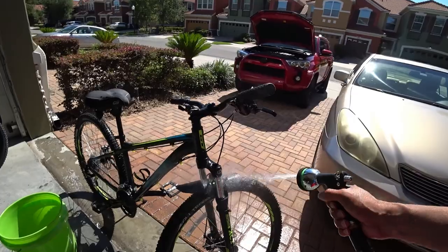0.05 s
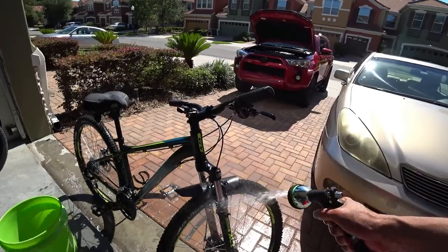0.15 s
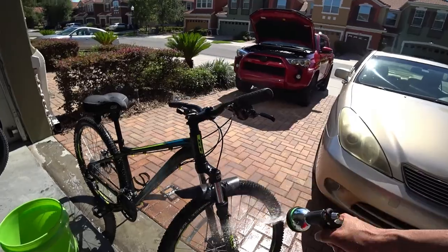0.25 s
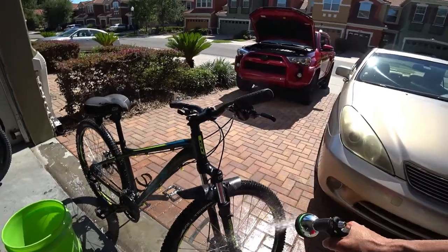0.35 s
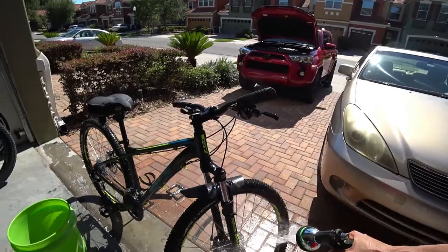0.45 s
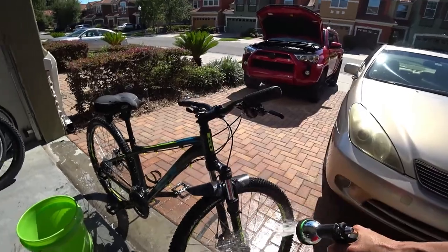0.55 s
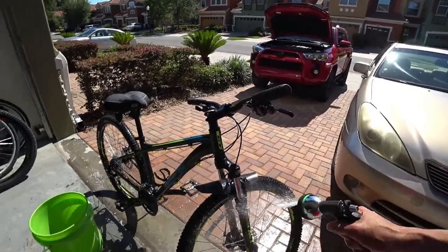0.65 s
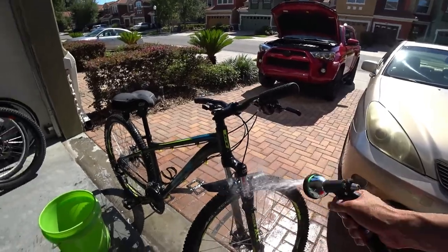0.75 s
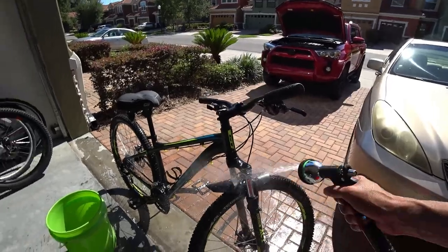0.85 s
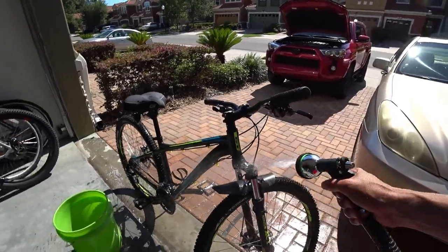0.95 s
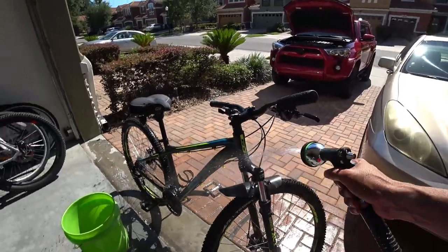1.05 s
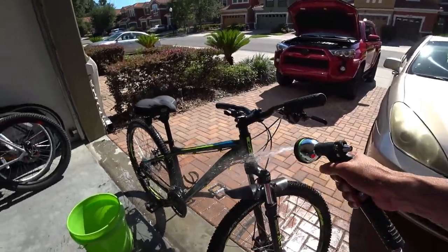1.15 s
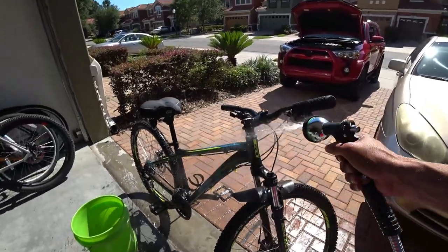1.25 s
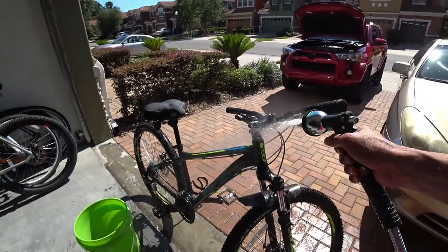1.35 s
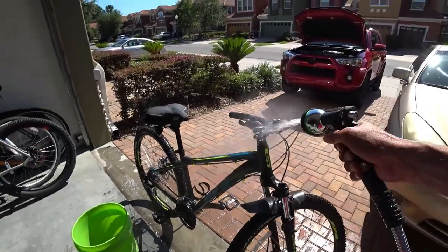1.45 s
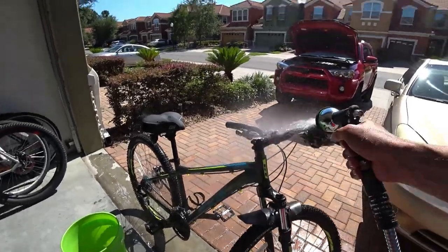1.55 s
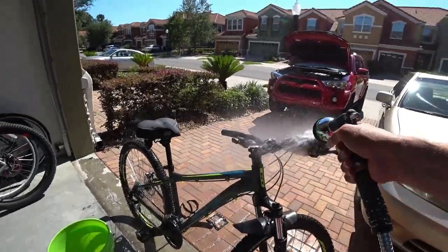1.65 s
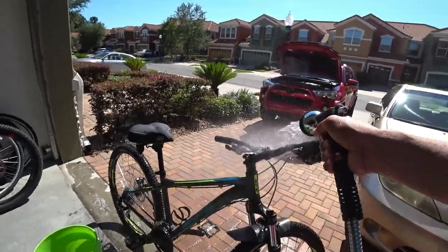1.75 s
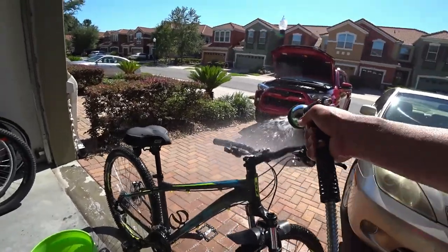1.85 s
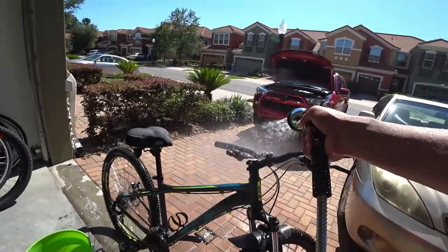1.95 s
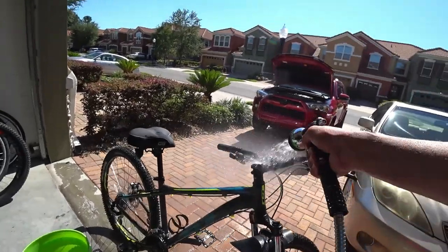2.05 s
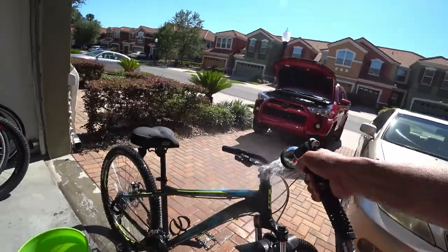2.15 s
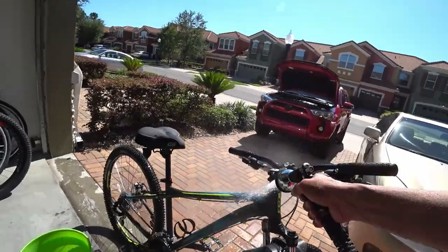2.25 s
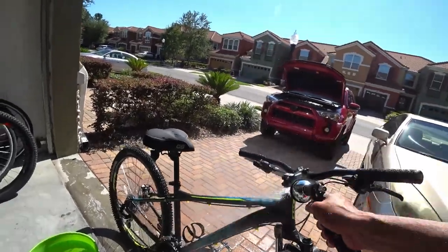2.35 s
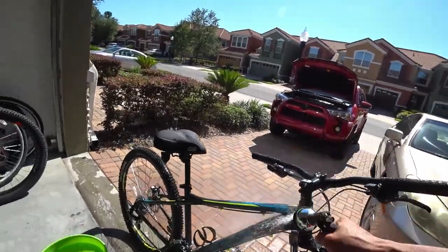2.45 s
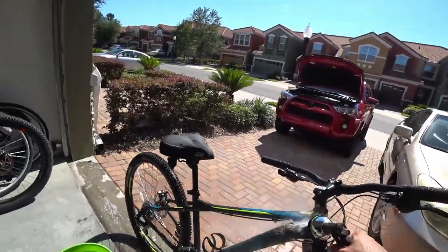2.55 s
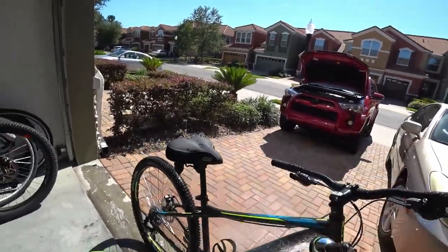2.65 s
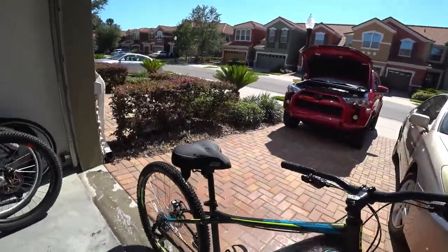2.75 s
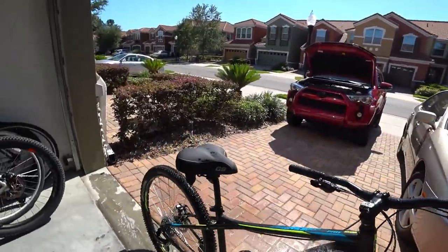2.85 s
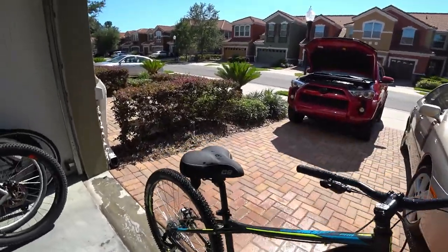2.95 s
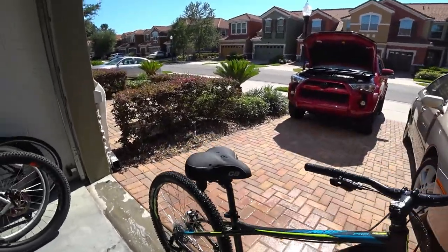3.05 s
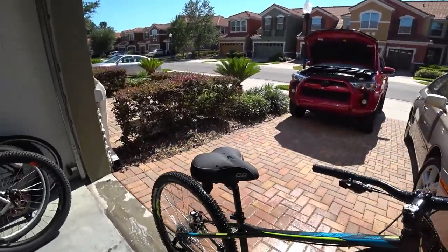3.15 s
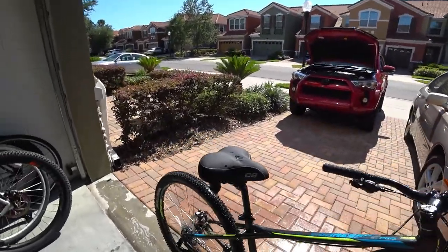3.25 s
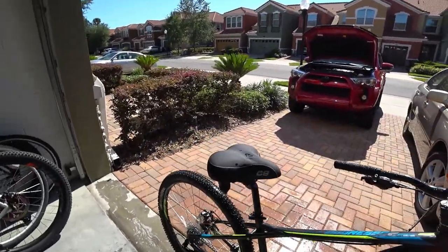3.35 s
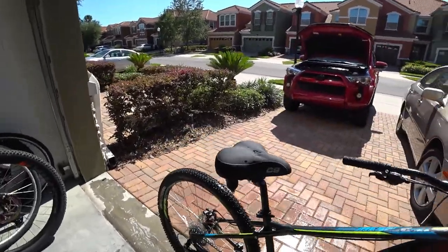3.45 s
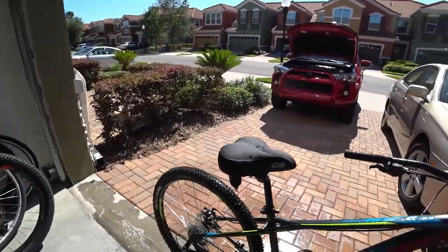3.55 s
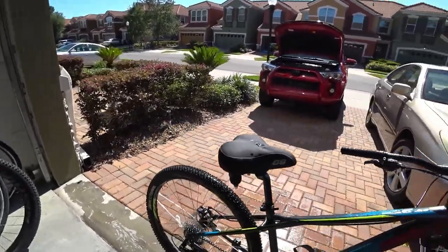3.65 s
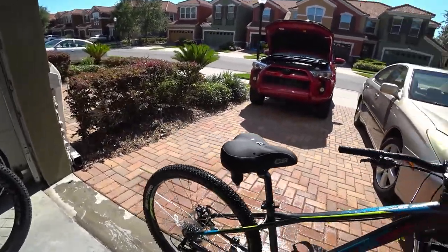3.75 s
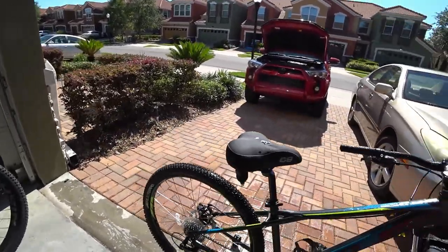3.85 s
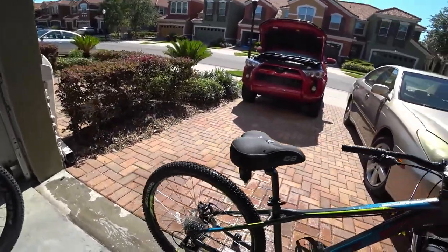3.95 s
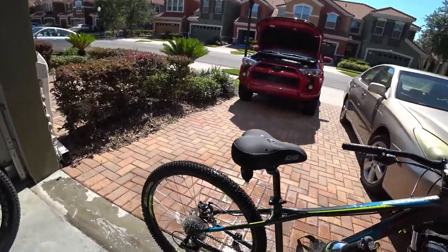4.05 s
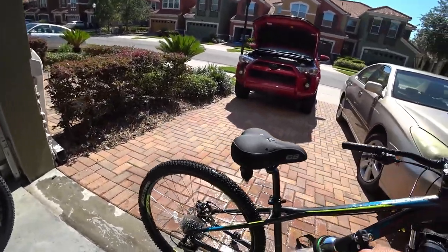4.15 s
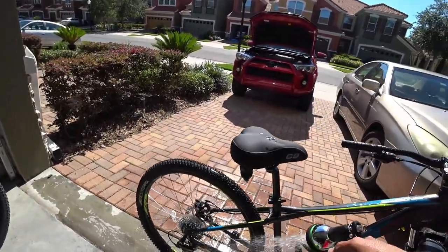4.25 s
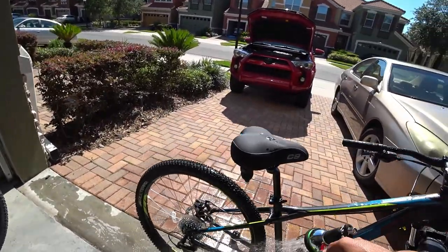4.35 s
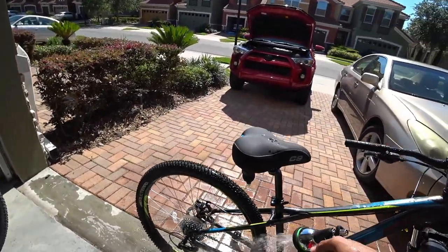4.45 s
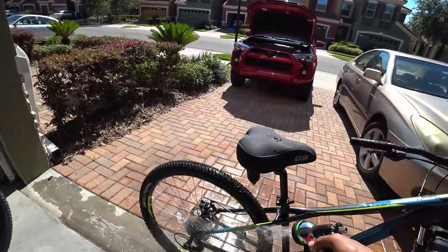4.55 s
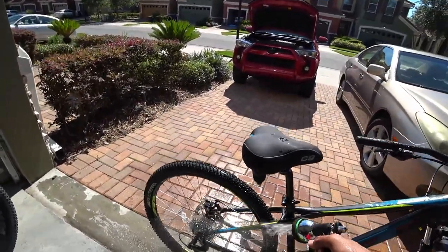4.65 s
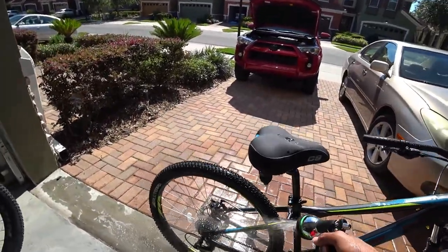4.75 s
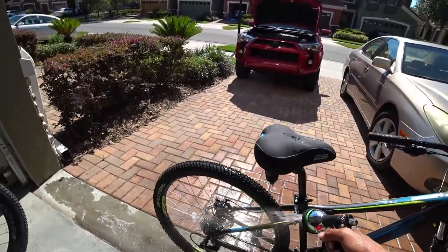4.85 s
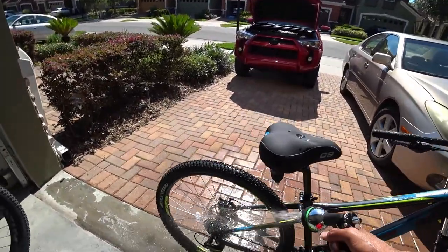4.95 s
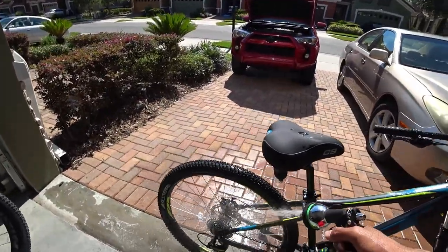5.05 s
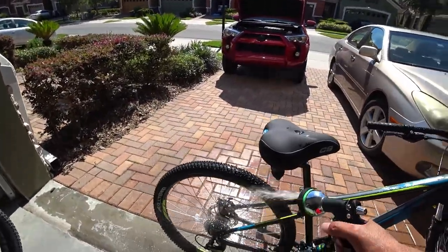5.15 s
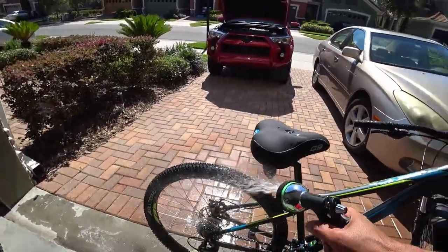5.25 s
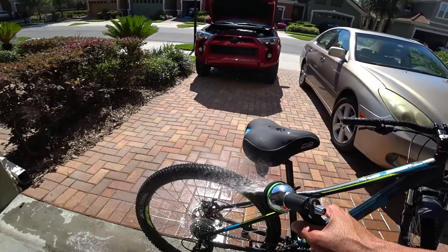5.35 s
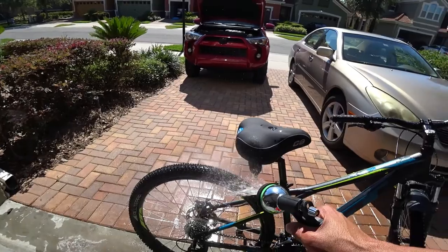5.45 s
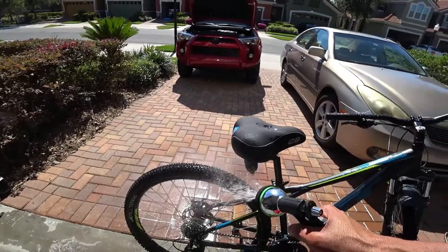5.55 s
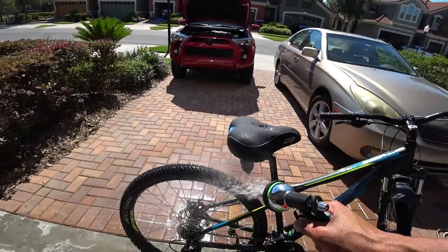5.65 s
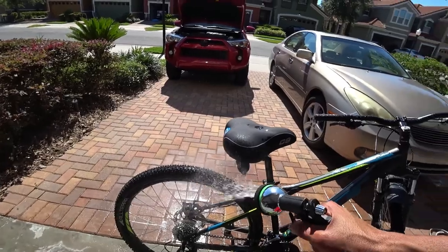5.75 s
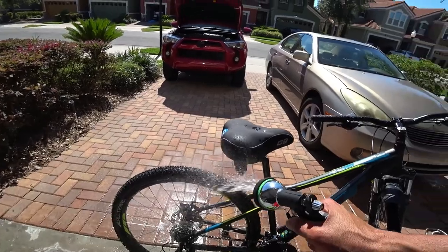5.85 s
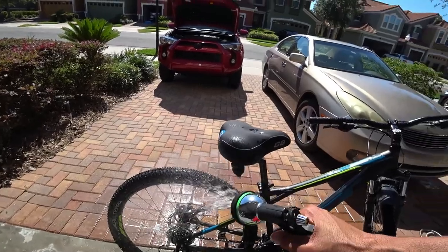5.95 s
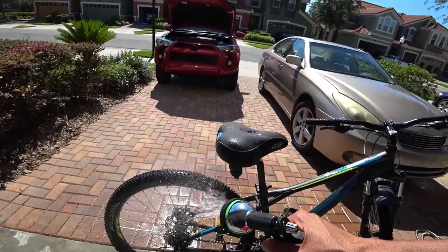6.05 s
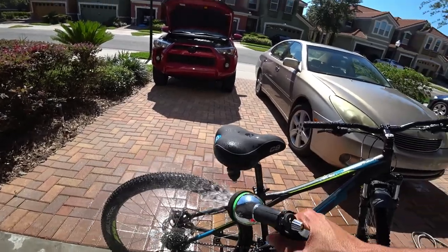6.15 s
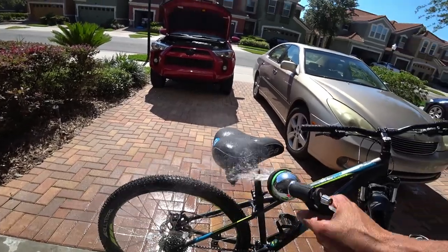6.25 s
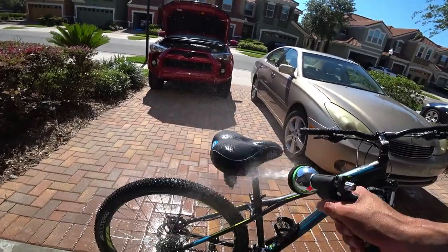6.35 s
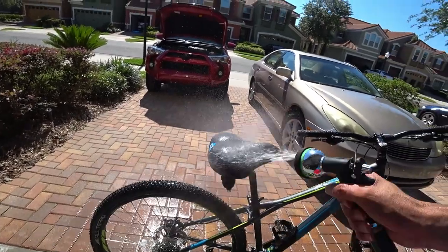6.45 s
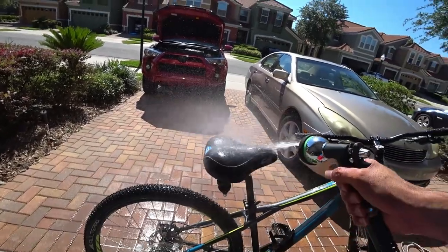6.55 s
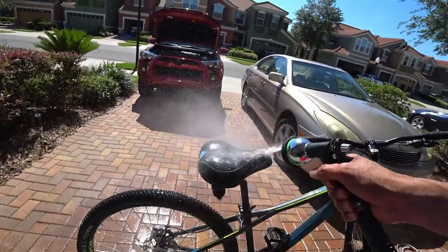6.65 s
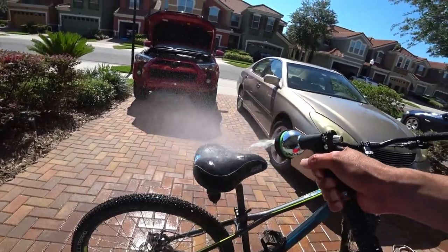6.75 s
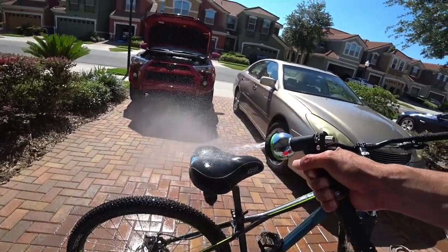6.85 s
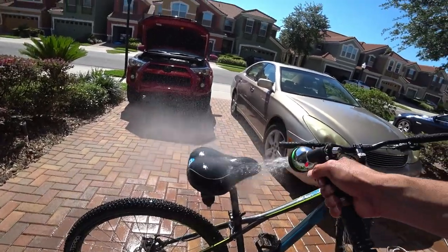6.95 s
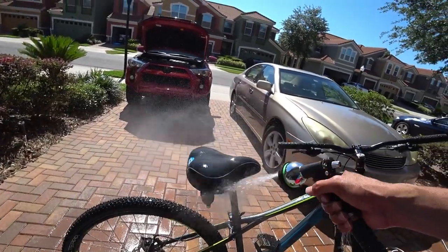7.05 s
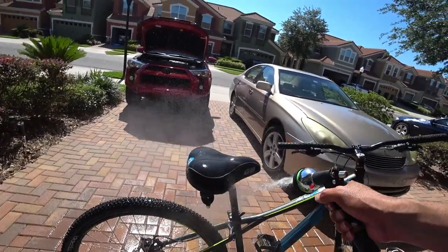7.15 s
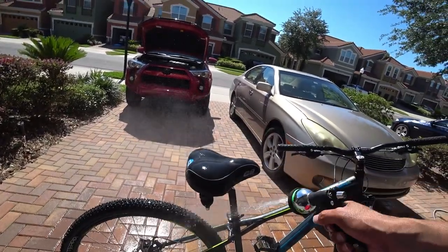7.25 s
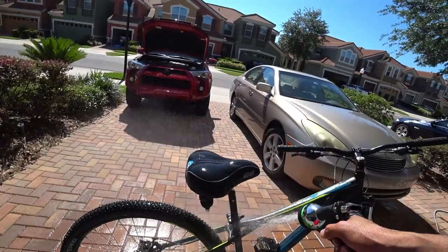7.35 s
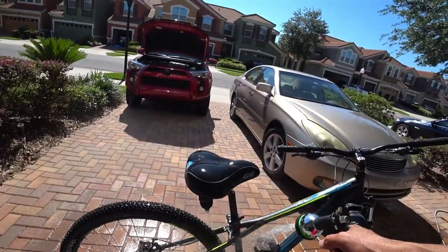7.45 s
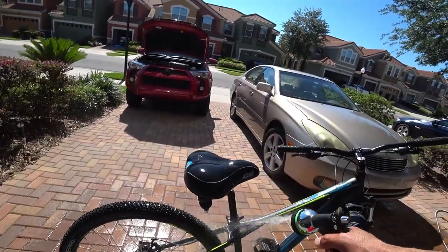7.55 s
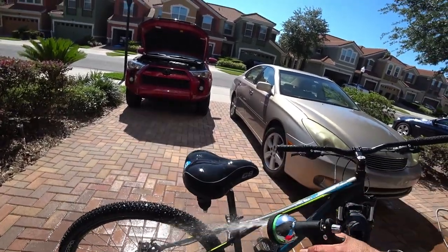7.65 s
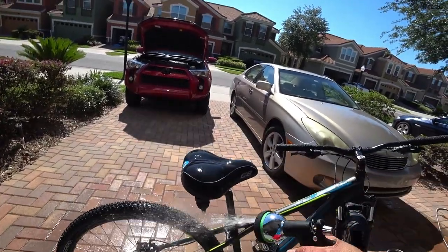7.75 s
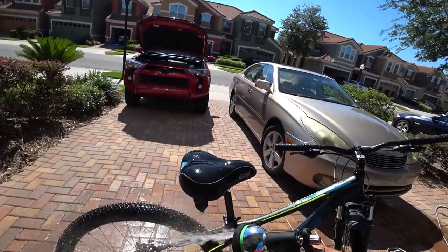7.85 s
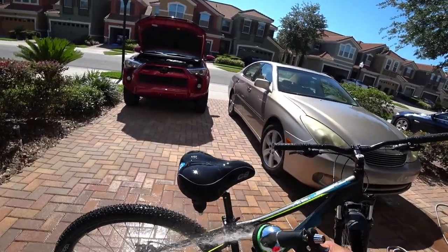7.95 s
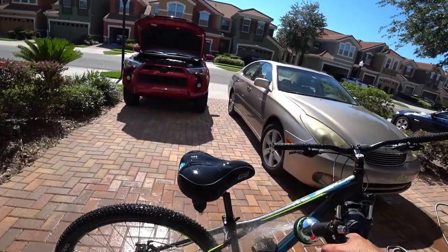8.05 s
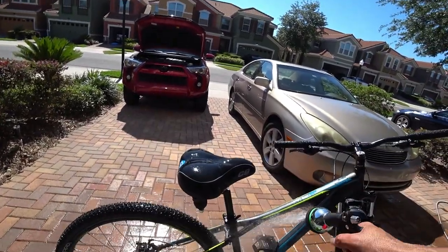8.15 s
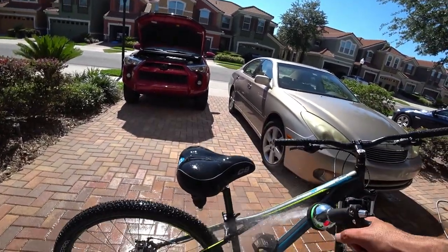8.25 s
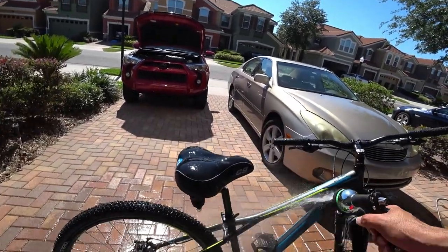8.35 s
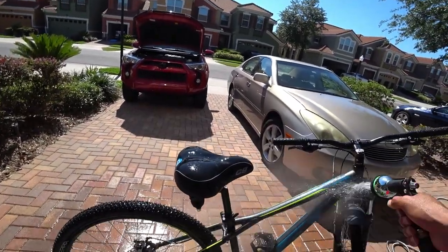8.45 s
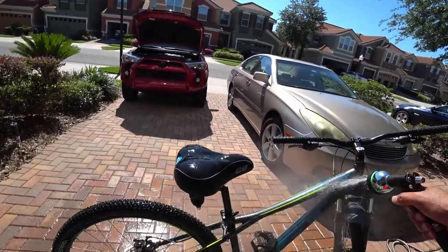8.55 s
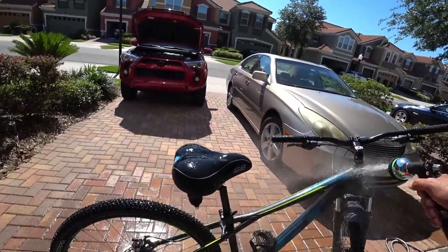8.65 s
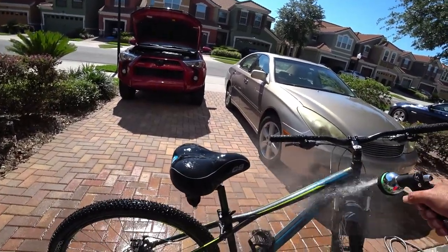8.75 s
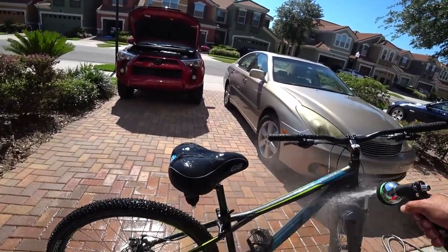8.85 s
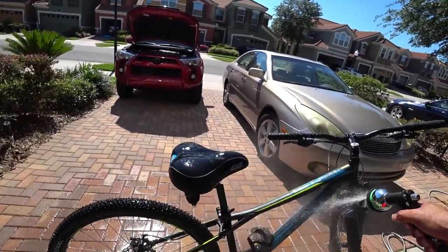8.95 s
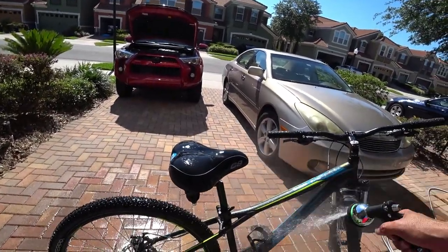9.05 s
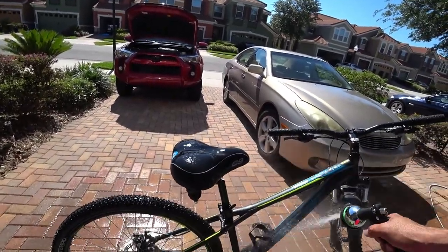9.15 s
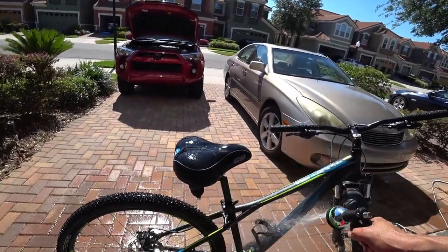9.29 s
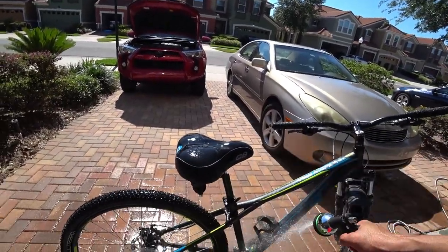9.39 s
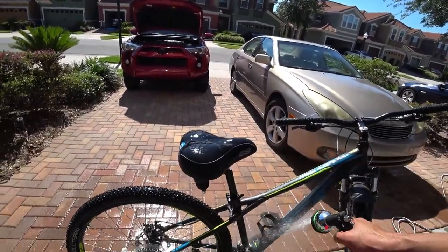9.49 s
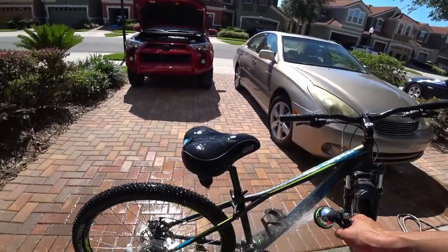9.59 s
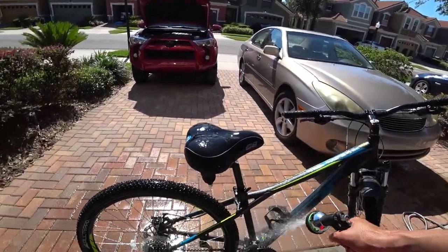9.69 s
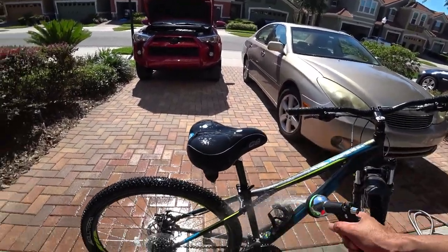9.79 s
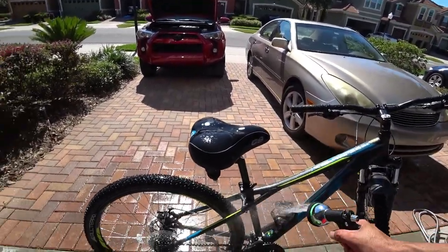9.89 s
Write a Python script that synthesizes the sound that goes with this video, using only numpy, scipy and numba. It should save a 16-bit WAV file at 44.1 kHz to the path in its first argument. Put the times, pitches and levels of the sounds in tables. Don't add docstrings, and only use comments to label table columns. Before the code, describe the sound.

A hose nozzle hisses steadily close by, its spray surging and crackling as it sweeps over a bicycle's tyre, metal parts and saddle outdoors.

```python
import sys
import numpy as np
from scipy import signal
from scipy.fft import rfft, irfft, next_fast_len
from scipy.io import wavfile
from scipy.ndimage import uniform_filter1d
from numba import njit

SR = 44100
rng = np.random.default_rng(int(sys.argv[2]) if len(sys.argv) > 2 else 0)


def linear_from_db(decibels):
    return 10 ** (np.asarray(decibels, float) / 20)


def store_wav(level_fs):
    pcm = np.round(np.clip(np.atleast_2d(level_fs), -1, 1) * 32767)
    wavfile.write(sys.argv[1], SR, pcm.T.astype(np.int16))


N = 437472
MS = np.arange(0, N / SR + .001, .001)

# (pitch [Hz], width [Hz], level [dB])
TYRE = [(745, 50, -51), (1415, 110, -33.5), (1615, 140, -35), (1900, 900, -34), (2210, 400, -32.5),
        (3430, 160, -40)]
BARS = [(1675, 80, -52), (4800, 160, -47)]
STEM = [(2650, 45, -50)]
CRANK = [(6850, 520, -33.5), (7250, 500, -37), (7500, 1200, -36)]
GEARS = [(2140, 180, -44), (2900, 180, -45)]
PEDAL = [(4365, 100, -42)]
STAY = [(1700, 40, -50), (4510, 90, -43.5)]
RIM = [(990, 55, -41)]
SADDLE = [(950, 240, -44), (1700, 500, -40), (3100, 1100, -35), (4850, 1000, -31.5), (6140, 600, -35),
          (7100, 800, -33.5)]
TOP_TUBE = [(5482, 65, -42), (5750, 1300, -34), (6010, 90, -43)]
HEAD_TUBE = [(3500, 38, -49), (7755, 130, -40), (7950, 700, -38)]
DOWN_TUBE = [(2705, 34, -44.5), (4740, 45, -48), (5495, 55, -48), (6010, 64, -48), (8700, 900, -41)]
BRACKET = [(3280, 26, -52), (3500, 36, -47), (3790, 43, -48), (4480, 67, -49), (4740, 62, -47),
           (6000, 120, -39.5), (7330, 150, -44), (7990, 220, -42), (8750, 110, -45)]
PAVING = [(3100, 520, -43)]
CABLE = [(7190, 100, -41)]
SPOKE = [(1230, 60, -47)]


def level(x, db):
    return x * linear_from_db(db) / np.sqrt(np.mean(x ** 2))


def colour(x, points, unit=linear_from_db):
    hz, value = np.transpose(points)
    size = next_fast_len(N)
    log_hz = np.log(np.arange(size // 2 + 1) * SR / size + 1)
    gain = unit(np.interp(log_hz, np.log(hz), value))
    return irfft(rfft(x, size) * gain, size)[..., :N]


def walk(rate):
    hold = int(SR / rate)
    held = rng.standard_normal(4096)[np.arange(N) // hold]
    return 1.3 * uniform_filter1d(uniform_filter1d(held, hold), hold)


def drones():
    # (start [s], end [s], pitch [Hz], level [dB])
    engines = [
        (0, 2.15, 71, -85),
        (3.6, 4.0, 134, -75),
        (5.7, 6.35, 115, -74),
        (7.2, 8.7, 128, -76.5),
    ]
    out, t = np.zeros(N), np.arange(N) / SR
    for t0, t1, hz, db in engines:
        fade = np.interp(t, [t0 - .08, t0 + .08, t1 - .08, t1 + 0.073], [0, 1, 1, 0])
        phase = 2 * np.pi * np.cumsum(hz * (1 + .025 * walk(4))) / SR
        out += np.sqrt(2) * linear_from_db(db + 2.5 * walk(4.8)) * fade * np.sin(phase)
    return out


def street():
    # (frequency [Hz], level [dB])
    traffic_tone = [(15, -65), (25, -55), (134, -20.5), (321, -1.5), (555, 0.5), (796, -1.5), (1160, -6.5),
                    (1500, -13.5), (1950, -3.5), (3300, -120)]
    # (frequency [Hz], level [dB])
    breeze_tone = [(15, -48), (25, -19), (86, -5.5), (190, 1), (250, -33), (420, -120)]
    traffic_db = -46
    breeze_db, gust_db, gusts_per_s = -76, 4.5, 7

    mid, side = colour(rng.standard_normal((2, N)), traffic_tone)
    side = colour(side, [(40, -22), (150, -19.0), (600, -8.0)])
    loudness = linear_from_db(traffic_db + 0.5 * walk(2.94)) / np.std(mid)
    rumble = np.array([colour(mid, [(130, -7.5), (210, -0.5)]), side]) * loudness

    gusts = linear_from_db(breeze_db + gust_db * walk(gusts_per_s))
    breeze = level(colour(rng.standard_normal(N), breeze_tone), 5.1) * gusts
    return rumble + breeze * [[1], [.17]] + drones() * [[1], [.4]]


@njit
def grains(start, hz, cycles, size, side):
    out = np.zeros((2, N + 4096))
    for k in range(len(start)):
        life = cycles * SR / hz[k]
        pole = np.exp(2j * np.pi * hz[k] / SR - 4 / life)
        z = size[k] * 4 * np.e / life + 0j
        for i in range(min(int(2.5 * life), 4096)):
            out[0, start[k] + i] += i * z.imag
            out[1, start[k] + i] += i * z.imag * side[k]
            z *= pole
    return out[:, :N]


def pops():
    # (time of peak [s], peak level [dB], pitch [Hz])
    fat_drops = [(.8257, -5, 6000), (1.0078, -16, 7000), (1.3956, -17, 8000), (2.0575, -15, 7500),
                 (2.1972, -10, 8250), (2.202, -12, 10400), (2.9262, -12.5, 6470), (3.8637, -13, 6000),
                 (4.1951, -22, 6800), (6.3642, -7, 6500), (6.894, -8, 7500), (7.1049, -13, 6500),
                 (7.2437, -14, 7030), (8.1619, -12, 6500), (8.7999, -18, 7500)]
    s, db, hz = np.transpose(fat_drops)
    start = ((s - 0.94 / hz) * SR).astype(np.int64)
    return grains(start, hz, 5.9, linear_from_db(db), 0 * s + .1)


def ringing(force):
    # (part, start [s], end [s], level [dB], pitch ratio of the wetted spot [1])
    touches = [(TYRE, 0, .19, -.5, 1), (TYRE, .69, .86, 0, 1), (BARS, 1.45, 2.08, 0, 1),
               (STEM, 2.7, 3.25, 0, 1), (CRANK, 3.1, 3.53, 0, 1), (CRANK, 3.6, 3.87, -1, 1.015),
               (CRANK, 3.9, 4.47, -3, .99), (GEARS, 3.42, 4.2, 0, 1), (PEDAL, 4.06, 4.13, -1, .99),
               (PEDAL, 4.12, 4.2, 0, 1.01), (STAY, 4.72, 5.17, 0, 1), (SPOKE, 4.79, 4.86, -1, 1),
               (SPOKE, 4.92, 4.97, -3, 1), (RIM, 5.29, 5.305, -6, .985), (RIM, 5.335, 5.38, 1.5, 1),
               (SADDLE, 6.21, 6.44, -1, 1), (SADDLE, 6.47, 6.83, -5, 1), (SADDLE, 6.86, 7.12, 0, 1),
               (PAVING, 7.6, 8.0, 0, 1), (CABLE, 8.02, 8.72, 0, 1), (TOP_TUBE, 8.13, 8.23, -5, 1),
               (TOP_TUBE, 8.33, 8.57, 0, 1), (TOP_TUBE, 8.64, 8.72, -6, 1), (HEAD_TUBE, 8.7, 9.06, 0, 1),
               (HEAD_TUBE, 9.06, 9.16, -6, 1.03), (DOWN_TUBE, 8.86, 9.72, 0, 1), (BRACKET, 9.2, 9.73, 0, 1)]
    arrive_s, leave_s, tail_s = .04, .06, .27
    out, t = np.zeros((2, N)), np.arange(N) / SR
    roughness = linear_from_db(1.7 * rng.standard_exponential(N))
    hits = rng.standard_normal((2, N)) * roughness * [[1], [.22]] * force
    waver_db = 1.4 * walk(16)
    for part, t0, t1, touch_db, ratio in touches:
        span = slice(max(int((t0 - arrive_s) * SR), 0), int((t1 + tail_s) * SR))
        arriving = (t[span] - t0) / arrive_s
        leaving = (t1 - t[span]) / leave_s
        touch = np.clip(np.minimum(arriving, leaving) + .5, 0, 1)
        for hz, width, db in part:
            shaken = touch * linear_from_db(np.roll(waver_db, rng.integers(N))[span])
            b, a = signal.iirpeak(hz * ratio, hz / width / 0.95, SR)
            ring = signal.lfilter(b, a, signal.lfilter(b, a, hits[:, span] * shaken))
            out[:, span] += level(ring, db + touch_db - 3.6)
    return out


def drops(kind, count):
    lo_hz, hi_hz, cycles, scatter_db, sideways, flicker_db = kind
    when, pitch = rng.random((count, 2)).T
    size_db = scatter_db * np.minimum(rng.standard_exponential(count), 6.5)
    size = linear_from_db(size_db) * rng.choice([-1., 1.], count)
    start = (when * N).astype(np.int64)
    hz = lo_hz * (hi_hz / lo_hz) ** pitch
    place = sideways * rng.standard_normal(count)
    shower = level(grains(start, hz, 1. * cycles, size, place), 0)
    return shower * np.sqrt((1 + sideways ** 2) / 2) * linear_from_db(flicker_db * walk(22))


def bump(middle, length, edge):
    return np.exp(-np.abs((MS - middle) * 2 / length) ** edge)


def spray():
    # (time [s], fizz [dB], weight of big drops [dB], fine mist [dB], left minus right [dB])
    aim = [(0, -33, -5, -10.5, 1), (.6, -33.5, -5, -10, .2), (1.0, -34, -7.5, -6.5, .5),
           (1.6, -33, -8.5, -3, .4), (1.95, -33.5, -5, -7.5, 1), (2.15, -33.5, -10, -2.5, .5),
           (2.75, -30, -8, -8.5, -0.5), (3.1, -32.5, -7, -7, .1), (3.6, -29.5, -5, -9, .3),
           (4.25, -29.5, -6, -6.5, .6), (4.6, -31.5, -5, -9.5, .6), (5.15, -32, -2.5, -9.5, 1.2),
           (6.15, -31, -2, -9.5, 1), (7.2, -33, -9, -7.5, 0), (7.8, -30.5, -3, -8, 1.9),
           (8.1, -31, -8, -6, .4), (8.7, -31, -9.5, -10, -.8), (9.92, -31.5, -7, -8, -.2)]
    # (middle [s], length [s], rise [dB], share of the rise in big drops [1])
    strikes = [(.0, .34, 10.5, 1), (0.768, 0.22, 13, 1.01), (.2, 0.11, 2, 1.2), (3.873, .035, 3, 1.4),
               (3.999, .025, 2.5, 2.4), (6.248, 0.081, 8.5, 0.43), (6.379, 0.19, 6.5, 0.36),
               (6.625, 0.12, 4, 0.27), (6.687, 0.91, 4, 1.04), (6.921, 0.15, 8, 1.05),
               (7.057, 0.16, 6.5, .6), (9.465, 0.55, 4, 0.41)]
    # (middle [s], length [s], rise [dB])
    flicks = [(.63, 0.057, 2.5), (1.026, .06, 1.5), (1.44, 0.14, 2.5), (1.676, 0.11, 3), (2.026, 0.11, 3.5),
              (7.876, .14, -3.5), (2.84, 0.061, 2.5), (2.903, 0.091, -4), (3.012, .08, 0.5),
              (3.18, 0.17, 2.5), (3.334, 0.1, 3.5), (3.483, 0.057, 3.5), (3.74, 0.26, 2.5),
              (2.69, .07, 1.5), (4.095, .18, 3.5), (4.38, 0.089, 3.5), (5.327, 0.2, 3), (5.5, .1, 3.5),
              (5.65, 0.1, 3), (5.822, 0.078, 2.5), (7.175, .05, -4.5), (7.27, .13, 1.5), (7.526, .09, 2),
              (4.54, .07, 2.2), (8.183, 0.092, 1), (8.457, 0.18, 2.5), (5.005, 0.054, 2),
              (8.687, 0.069, 1.5), (8.98, 0.38, 2.2), (9.69, .06, 2.5)]
    # (lowest [Hz], highest [Hz], ring [cycles], size scatter [dB], sideways scatter [0-1],
    # flicker [dB])
    mist = (9460, 12900, 3.2, 2.3, 0.25, 1.54)
    fizz = (4960, 9400, 3.78, 1.16, 0.27, 0.57)
    splash = (2080, 4910, 2.65, 0.81, 0.28, 1.35)
    drum = (946, 2130, 4.67, 0.8, 0.4, 0.23)

    t = np.arange(N) / SR
    s, *columns = np.transpose(aim)
    fizz_db, weight_db, mist_db, pan_db = (np.interp(t, s, c) for c in columns)

    rises = [(db * bump(middle, length, 4.1), share) for middle, length, db, share in strikes]
    strike_db = np.interp(t, MS, sum(db for db, share in rises))
    heavy_db = np.interp(t, MS, sum(db * share for db, share in rises))
    flick_db = np.interp(t, MS, sum(db * bump(middle, length, 2.1) for middle, length, db in flicks))

    mist_db = mist_db + 0.77 * strike_db + 1.5 * flick_db
    splash_db = weight_db + heavy_db + 0.28 * flick_db
    drum_db = -6.5 + 0.63 * weight_db - 0.68 * (fizz_db - np.mean(fizz_db))
    drum_db = drum_db + 0.81 * heavy_db + 0.12 * flick_db
    sputter_db = 0.49 * walk(35) + 0.38 * walk(200)

    shower = linear_from_db(strike_db + flick_db) * drops(fizz, count=80000)
    shower += linear_from_db(mist_db + 3.5) * drops(mist, count=50000)
    shower += linear_from_db(splash_db) * drops(splash, count=45000)
    shower += linear_from_db(drum_db) * drops(drum, count=25000)
    force = linear_from_db(1.1 * (fizz_db + strike_db + flick_db))
    return shower * linear_from_db(fizz_db + sputter_db) + ringing(force), pan_db


def scene():
    shower, pan_db = spray()
    mid, side = colour(shower + pops(), [(250, -23), (550, 4), (800, -0.5)])
    far, wide = street()
    water = np.array([mid + side, mid - side]) * linear_from_db(np.array([pan_db, -pan_db]) / 2)
    return water + np.array([far + wide, far - wide])


def band_limit(x):
    return signal.sosfilt(signal.butter(12, 12380, fs=SR, output="sos"), x)


def record(dry):
    # (frequency [Hz], level [dB])
    mic_tone = [(60, -2), (300, -3), (750, -0.87), (1000, -3), (2500, -2.27), (4000, 1.44), (5500, -3.5),
                (6900, 0), (8300, -0.35), (9400, -2.5), (10900, 2.5)]
    # (frequency [Hz], phase by which left lags right [rad])
    port_lags = [(60, .05), (300, 0.17), (550, 0.37), (950, 0.79), (1800, 0.61), (2700, 0.75), (3900, 0.14),
                 (5500, 0.099), (8000, 0.27), (10500, .12)]
    top_hz = 11020

    def lag_gain(lag):
        return np.exp(.5j * lag * np.array([[-1], [1]]))

    heard = colour(colour(dry, mic_tone), port_lags, lag_gain)
    heard = colour(heard, [(top_hz - 20, 0), (top_hz + 40, -22), (top_hz + 130, -28), (top_hz + 260, -80)])
    return band_limit(heard)


dry = scene()
out = record(dry)
store_wav(out)
```